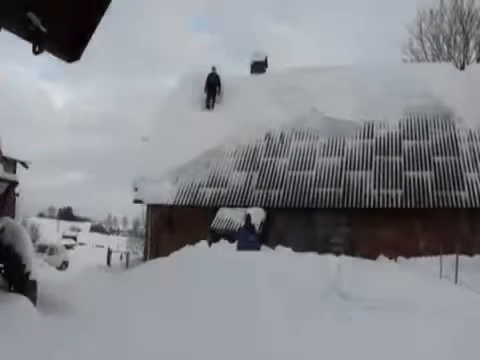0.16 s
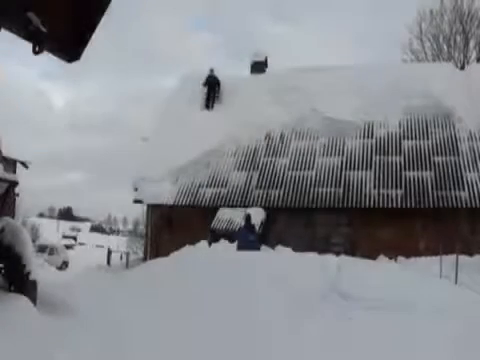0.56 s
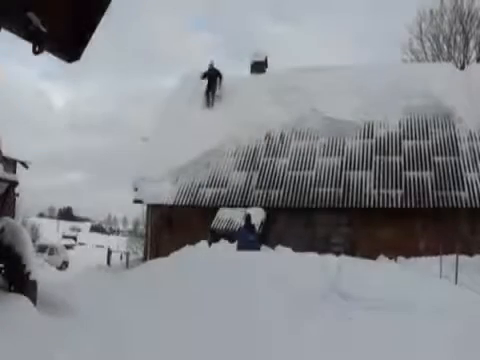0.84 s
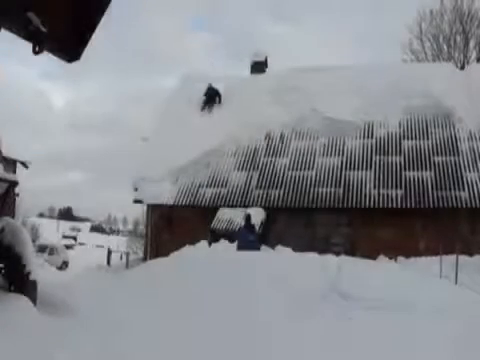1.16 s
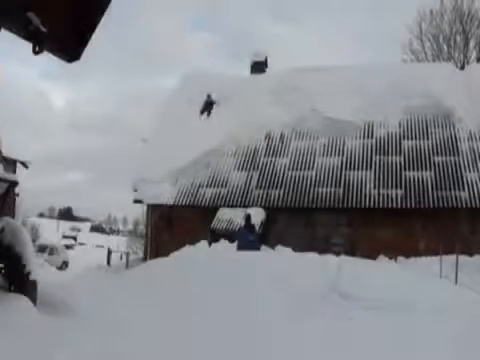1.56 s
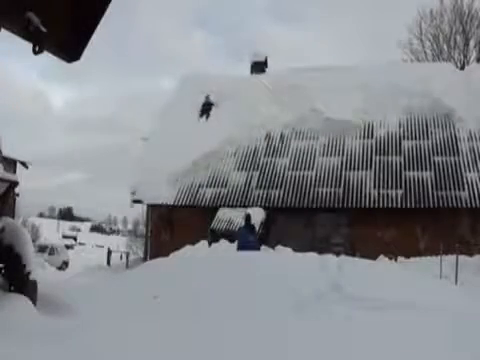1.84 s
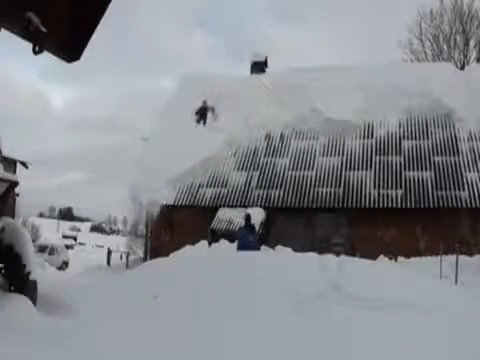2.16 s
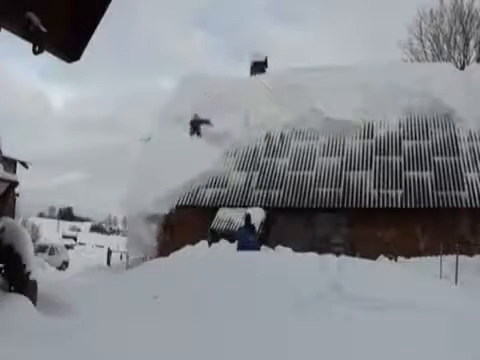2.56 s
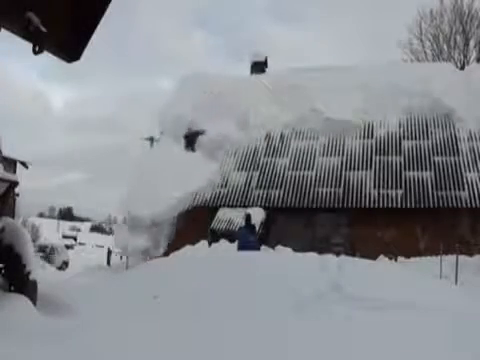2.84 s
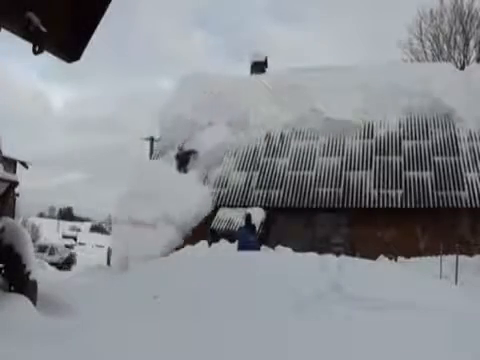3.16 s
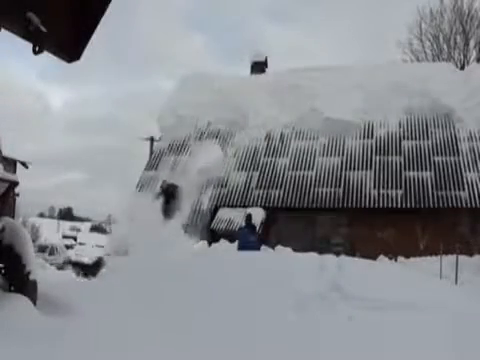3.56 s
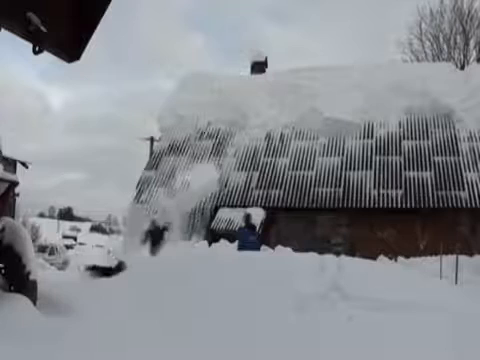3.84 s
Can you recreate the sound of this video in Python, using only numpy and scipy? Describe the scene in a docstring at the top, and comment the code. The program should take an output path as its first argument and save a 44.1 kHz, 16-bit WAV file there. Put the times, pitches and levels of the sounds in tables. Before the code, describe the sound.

A slab of snow creaks faintly, breaks loose with a bump and slides down a ribbed roof in a hissing, scraping roar. Lumps thud into the snow below, heard from across a quiet yard.

```python
"""A slab of snow creeps, breaks loose and slides down a ribbed sheet roof, heard in stereo from across
a quiet snowy yard. Friction makes the roof roar and its low panels boom; ice grit scrapes, powder hisses,
the slab bumps on the sheets and a hard edge sings along a rib. Lumps thud into the snow bank over a
ground rumble. A nearby wall sends one dull echo of the roof. Behind it all lie the air of the yard,
a faint whine and microphone hiss."""
import sys
import numpy as np
from scipy import signal
from scipy.fft import rfft, irfft
from scipy.io import wavfile

SR = 44100
rng = np.random.default_rng(int(sys.argv[2]) if len(sys.argv) > 2 else 0)


def put_to_file(sound):
    """Save the sound as 16-bit audio at rate SR, in the file named by the first command-line argument."""
    columns = np.atleast_2d(sound).T  # one column per channel
    safe = np.clip(columns, -1, 1)
    whole_steps = np.round(safe * 32767)
    wavfile.write(sys.argv[1], SR, whole_steps.astype(np.int16))


N = 176400

# Air of the yard and microphone hiss: (time [s], level [dB])
AIR_LEVEL = [(0, -60), (.4, -59), (1.2, -59), (4, -60)]
# Its spectrum: (frequency [Hz], relative level [dB])
AIR_SPECTRUM = [(15, -40), (25, -17), (70, -6), (150, -4.5), (330, -5.5), (700, -4.5), (1200, -6.5),
                (2000, -10), (2600, -12.5), (6000, -14), (15000, -14)]
# Its stereo width: (frequency [Hz], side relative to mid [dB])
AIR_SIDE = [(60, -19), (110, -15), (200, -5), (380, -1), (690, -2.5), (1280, -1.5), (2360, -4), (4350, -7),
            (8020, -28), (14800, -65)]

# Ground rumble while the mass lands: (time [s], level [dB])
RUMBLE_LEVEL = [(1.3, -110), (1.43, -71), (1.48, -64), (1.6, -73), (2.4, -71.5), (3.0, -63.5), (3.4, -59),
                (3.7, -61), (4.0, -64)]
# Its spectrum: (frequency [Hz], relative level [dB])
RUMBLE_SPECTRUM = [(15, -20), (25, -4), (40, -11), (80, -2), (130, -5.5), (200, -14), (300, -52)]
# Lumps landing in the snow bank: (time [s], level [dB], pitch [Hz])
LUMP_THUDS = [(1.453, -53, 69.5), (3.16, -53, 55), (3.395, -38.5, 79), (3.44, -41, 80.6), (3.69, -55, 51)]

# Snow shifting before the break: (time [s], level [dB])
CREEP_LEVEL = [(.66, -77), (.72, -61), (.745, -66), (.77, -81), (1.2, -80), (1.27, -62), (1.35, -55.5),
               (1.41, -56.5), (1.45, -58), (1.5, -88)]
# Its spectrum: (frequency [Hz], relative level [dB])
CREEP_SPECTRUM = [(150, -12), (350, -1), (900, -8), (1900, -8), (2600, -11.5), (4500, -10), (7000, -8.5),
                  (10000, -17), (14000, -20)]
# Soft bumps of the slab on the roof: (time [s], level [dB], centre [Hz])
SLAB_BUMPS = [(0.741, -59, 450), (1.338, -62, 380), (1.443, -46.5, 374), (1.453, -43, 500),
              (1.501, -45, 700), (3.09, -36, 1200)]
# A hard edge dragging along a rib: (time [s], level [dB], pitch [Hz])
RIB_SCRAPE = [(2.6, -100, 3700), (2.68, -69, 3700), (2.76, -43, 3850), (2.86, -45, 4300), (2.94, -56, 4200),
              (3.02, -60, 4100), (3.1, -100, 4100)]

# The slide: (time [s], roof roar [dB], panel boom [dB], rasp [dB], grit scrape [dB], powder hiss [dB])
SLIDE_LEVELS = [(1.46, -42, -56, -50, -58, -49), (1.48, -52, -40, -46.5, -50.5, -46),
                (1.51, -41, -51.5, -46, -45, -40.5), (1.64, -46.5, -53, -46.5, -51, -45),
                (1.67, -45, -50.5, -48.5, -48, -43), (1.88, -47.5, -51.5, -48, -48.5, -42),
                (2.35, -43.5, -53.5, -45.5, -46.5, -39), (2.39, -42, -50.5, -45.5, -46.5, -41.5),
                (2.43, -45, -50.5, -45, -46, -40.5), (2.84, -42.5, -52, -42, -40, -39),
                (2.89, -41, -46, -41, -38, -39.5), (2.91, -42.5, -52.5, -45.5, -40.5, -40),
                (3.04, -41.5, -45, -42.5, -43, -41), (3.17, -41.5, -53, -42, -44, -38.5),
                (3.28, -42, -49, -38.5, -44, -42.5), (3.3, -41, -50, -44.5, -46.5, -43.5),
                (3.38, -39.5, -51, -45, -47.5, -43.5), (3.46, -40.5, -50.5, -44.5, -48, -44),
                (3.69, -46, -49.5, -45.5, -45, -42.5), (3.74, -42.5, -58, -47, -46, -39.5),
                (3.77, -48, -59, -46, -45, -42.5), (3.84, -48, -56, -46.5, -46.5, -45.5),
                (3.88, -49, -59, -45.5, -48, -44.5), (4.0, -44.5, -58.5, -47.5, -46, -43)]
# Spectra of those five layers, each: (frequency [Hz], relative level [dB])
ROAR_SPECTRUM = [(290, -20), (500, -0.5), (814, 6.5), (1200, -4.5), (1560, -16), (2640, -120)]
BOOM_SPECTRUM = [(71, -31), (120, -10.5), (183, -20), (249, -4), (500, -5), (650, -7), (1100, -120)]
RASP_SPECTRUM = [(710, -21), (1200, -0.5), (2020, 4), (2500, -14), (3250, -14), (5500, -120)]
GRIT_SPECTRUM = [(1470, -34), (2500, 1), (4150, 5), (5400, -1), (7020, -10), (11900, -120)]
POWDER_SPECTRUM = [(3180, -29), (5400, -7.5), (7570, 1.5), (9170, -2.5), (14400, -18), (15000, -15)]
# Narrow stereo width of slide, creep and rumble: (frequency [Hz], side relative to mid [dB])
SNOW_SIDE = [(100, -22), (700, -16.5), (1500, -13), (2500, -57.5), (5000, -106), (14000, -50)]


def from_db(db):
    """Decibels to gain."""
    return 10 ** (np.asarray(db) / 20)


def unit_rms(x):
    """Scale to an rms of 1."""
    return x / np.sqrt(np.mean(x ** 2) + 1e-20)


def butterworth(x, order, hz, kind):
    """Low-, high- or band-pass filter."""
    return signal.sosfilt(signal.butter(order, hz, kind, fs=SR, output="sos"), x)


def in_time(rows):
    """A table's columns at every sample, held at the ends."""
    times, *columns = np.transpose(rows)
    return [np.interp(np.arange(N) / SR, times, column) for column in columns]


def gain_at(rows, hz):
    """Gain from a table of decibels, read on a log-frequency axis."""
    table_hz, db = np.transpose(rows)
    return from_db(np.interp(np.log(hz), np.log(table_hz), db))


def drift(rate_hz):
    """Slow random wander with an rms of 1."""
    hop, settle = 40, 2000
    pole = np.exp(-2 * np.pi * rate_hz * hop / SR)
    noise = rng.standard_normal(N // hop + settle + 2)
    slow = signal.lfilter([1], [1, -2 * pole, pole * pole], noise)[settle:]
    return np.interp(np.arange(N) / hop, np.arange(len(slow)), unit_rms(slow))


def coloured(source, spectrum, width, flicker_db):
    """Shape a source into a stereo pair whose half-octave bands flicker separately; mid rms 1."""
    hz = np.maximum(np.fft.rfftfreq(N, 1 / SR), 1)
    low_hz, high_hz = spectrum[0][0] / 2, spectrum[-1][0] * 2
    shape = gain_at(spectrum, hz) * (hz > low_hz) * (hz < high_hz)
    side_noise = rfft(rng.standard_normal(N)) * gain_at(width, hz)
    mid_side = np.array([rfft(source), side_noise]) * shape
    centres = 25 * 2 ** np.arange(0, 9.6, .5)
    out = np.zeros((2, N))
    for centre in centres[(centres > low_hz) & (centres < high_hz)]:
        band = np.cos(np.pi * np.clip(np.log2(hz / centre), -.5, .5)) ** 2
        out += irfft(mid_side * band, N) * from_db(flicker_db * drift(rate_hz=4.7))
    mid, side = out / np.sqrt(np.mean(out[0] ** 2))
    return np.array([mid + side, mid - side])


def yard_air():
    """Steady air and microphone hiss, wide in the midrange and centred in the treble."""
    level_db, = in_time(AIR_LEVEL)
    return from_db(level_db) * coloured(rng.standard_normal(N), AIR_SPECTRUM, AIR_SIDE, flicker_db=.2)


def whine(centre_hz=1985, width_hz=50, level_db=-75):
    """A faint breathy whine in the background: one narrow band of noise."""
    edges_hz = [centre_hz - width_hz / 2, centre_hz + width_hz / 2]
    return from_db(level_db) * unit_rms(butterworth(rng.standard_normal((2, N)), 1, edges_hz, "band"))


def wall_echo(roof, delay_s=.02386, gain_db=-7.5, low_hz=230, high_hz=2000):
    """Off the nearby wall, sound travels some 8 m farther to the microphone and loses bass and treble."""
    thin = butterworth(roof, 2, low_hz, "high")
    dull = butterworth(thin, 2, high_hz, "low")
    lag = int(delay_s * SR)
    return from_db(gain_db) * np.pad(dull, ((0, 0), (lag, 0)))[:, :N]


def ground_rumble():
    """The ground rumbles unevenly under the landing mass."""
    level_db, = in_time(RUMBLE_LEVEL)
    rumble = coloured(rng.standard_normal(N), RUMBLE_SPECTRUM, SNOW_SIDE, flicker_db=1.5)
    return from_db(level_db) * rumble


def lump_thuds(t60_s=.22, rise_s=1 / 120):
    """Each lump pushes softly into the snow bank: a low tone that swells and dies."""
    out = np.zeros(N)
    for time_s, db, hz in LUMP_THUDS:
        start = int(time_s * SR)
        t = np.arange(N - start) / SR
        envelope = from_db(db - 60 * t / t60_s) * (1 - np.exp(-t / rise_s))
        out[start:] += envelope * np.sin(2 * np.pi * hz * t)
    return out


def crystal_friction(grains_per_s=6000, spread_db=2.5, grain_share=.25):
    """Crystals breaking and dragging: a dense rain of uneven clicks over smooth noise."""
    sizes = from_db(spread_db * np.minimum(rng.exponential(1, N), 5))
    signs = rng.choice([-1, 1], N)
    grains = unit_rms(sizes * signs * (rng.random(N) < grains_per_s / SR))
    return np.sqrt(grain_share) * grains + np.sqrt(1 - grain_share) * rng.standard_normal(N)


def slab_creep():
    """Snow shifts on the roof with a faint crunching hiss that drops away as the slab lets go."""
    level_db, = in_time(CREEP_LEVEL)
    return from_db(level_db) * coloured(crystal_friction(), CREEP_SPECTRUM, SNOW_SIDE, flicker_db=1.7)


def slab_bumps(t60_s=.11):
    """The slab bumps on the roof, each time a dying puff of noise two octaves wide."""
    out = np.zeros(N + SR)
    t = np.arange(SR // 4) / SR
    for time_s, db, hz in SLAB_BUMPS:
        start = int(time_s * SR)
        puff = butterworth(rng.standard_normal(len(t)), 1, [hz / 2, hz * 2], "band")
        out[start:start + len(t)] += from_db(db - 60 * t / t60_s) * unit_rms(puff)
    return out[:N]


def rib_scrape(width_hz=600):
    """A hard edge drags along a rib and sings: a band of friction noise whose centre glides."""
    level_db, hz = in_time(RIB_SCRAPE)
    in_phase, quadrature = butterworth([crystal_friction(), crystal_friction()], 2, width_hz / 2, "low")
    phase = 2 * np.pi * np.cumsum(hz) / SR
    return from_db(level_db) * unit_rms(in_phase * np.cos(phase) + quadrature * np.sin(phase))


def slab_slide(break_rise_s=.012):
    """The slab runs down the sheets: one friction drives roar, boom, rasp, grit and powder hiss."""
    at_rest = (SLIDE_LEVELS[0][0] - break_rise_s,) + (-90,) * 5
    levels_db = in_time([at_rest, *SLIDE_LEVELS])
    spectra = ROAR_SPECTRUM, BOOM_SPECTRUM, RASP_SPECTRUM, GRIT_SPECTRUM, POWDER_SPECTRUM
    friction = crystal_friction()
    surge_db = .37 * drift(rate_hz=9.7)
    return sum(from_db(db + surge_db) * coloured(friction, spectrum, SNOW_SIDE, flicker_db=.5)
               for db, spectrum in zip(levels_db, spectra))


def scene():
    """From across the yard: the roof and its echo, snow landing below, and the air all round."""
    roof = slab_slide() + slab_creep() + slab_bumps() + rib_scrape()
    return roof + wall_echo(roof) + lump_thuds() + ground_rumble() + whine() + yard_air()


def record(dry):
    """The microphone signal is cut steeply above about 15 kHz."""
    return signal.sosfilt(signal.ellip(N=14, rp=.5, rs=80, Wn=14980, fs=SR, output="sos"), dry)


dry = scene()
out = record(dry)
put_to_file(out)
```